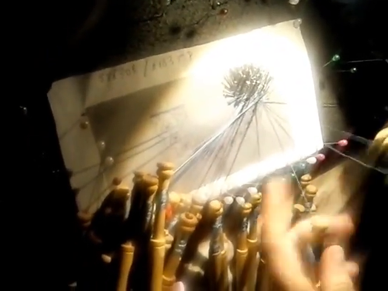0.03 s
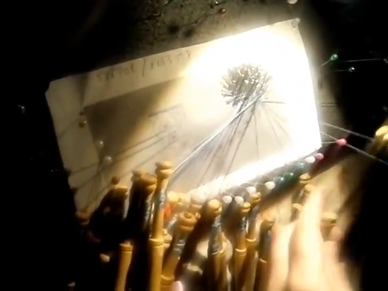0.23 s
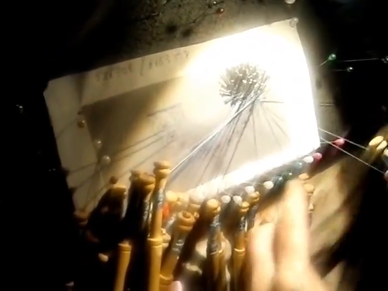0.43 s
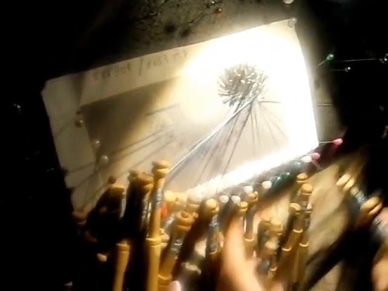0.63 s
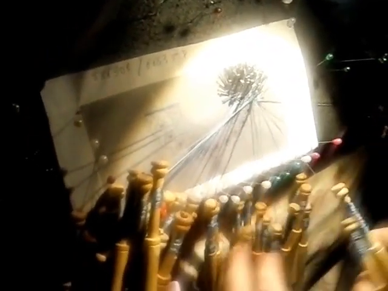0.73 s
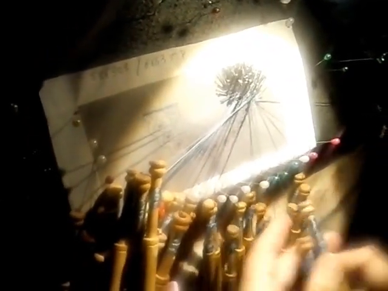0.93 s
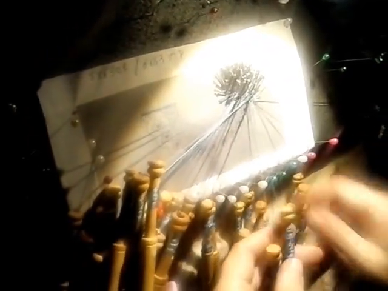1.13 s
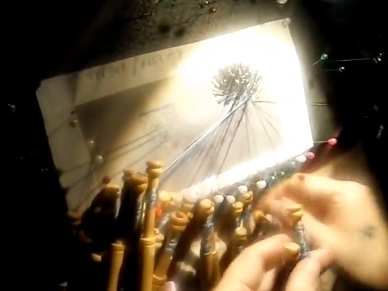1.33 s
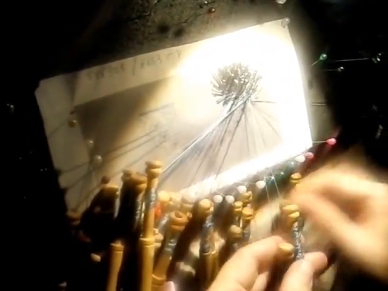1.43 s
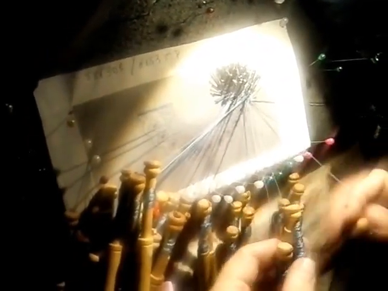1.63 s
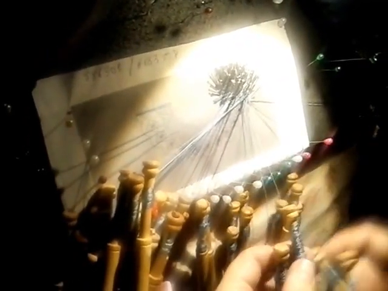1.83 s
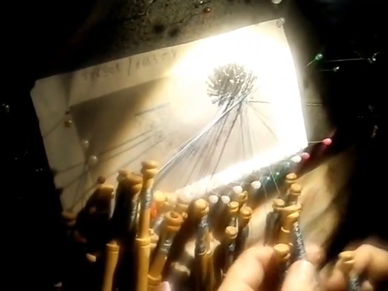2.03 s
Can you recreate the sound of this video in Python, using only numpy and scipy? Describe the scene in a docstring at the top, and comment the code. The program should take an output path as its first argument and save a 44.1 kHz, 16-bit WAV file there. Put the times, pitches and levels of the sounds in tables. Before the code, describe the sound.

Close up indoors, wooden bobbins tick sharply early on, pause with slight rubbing and sliding thread, then clatter most densely around one second, followed by lighter clicks, thuds and gentle hiss.

```python
"""Wooden lace bobbins knock together in clusters as hands cross them over a lace pillow in a small quiet room.
Each knock is a short broad tick plus three decaying bending modes of two slender sticks.
Some land on the pillow with a dull thud, a set of lower damped modes.
Fingers rustle on cloth and thread as shaped noise, over the steady noise of room and microphone."""
import sys
import numpy as np
from scipy import signal
from scipy.fft import rfft, irfft, next_fast_len
from scipy.io import wavfile
from scipy.ndimage import map_coordinates

SR = 44100
rng = np.random.default_rng(int(sys.argv[2]) if len(sys.argv) > 2 else 0)


def dump_mix(stems):
    """Bounce the given channels to the path in sys.argv[1] as a 16-bit WAV at rate SR."""
    frames = np.atleast_2d(stems).T  # one column per channel
    limited = np.clip(frames, -1, 1)  # hard clip at full scale
    pcm = np.round(limited * 32767).astype(np.int16)
    wavfile.write(sys.argv[1], SR, pcm)


N = 92610  # length in samples


def amp(db):
    """Decibels to amplitude: 20 dB is a factor of ten."""
    return 10 ** (np.asarray(db) / 20)


def unit(x):
    """Normalisation by signal power: the rms becomes 1."""
    return x / np.sqrt(np.mean(x ** 2) + 1e-20)


def along(points, hz):
    """Interpolation of (Hz, value) points on a logarithmic frequency axis."""
    f, v = np.transpose(points)
    return np.interp(np.log(hz + 1), np.log(f + 1), v)


def level(rows):
    """An envelope: gain per sample, linear in dB between (s, dB) points and at -120 dB outside them."""
    s, db = np.transpose(rows)
    return amp(np.interp(np.arange(N) / SR, s, db, left=-120, right=-120))


def wobble(rate):
    """Slow random modulation: a smooth curve through random knots, rate of them a second."""
    knots = rng.standard_normal(int(N * rate / SR) + 4)
    return map_coordinates(knots, [np.arange(N) * rate / SR])


def filtered(x, response):
    """Linear filtering: the spectrum of x is multiplied by a response given as a function of Hz."""
    m = next_fast_len(N + SR // 2)
    hz = np.fft.rfftfreq(m, 1 / SR)
    return irfft(rfft(x, m) * response(hz), m)[..., :N]


def noise(spectrum):
    """Coloured noise of rms 1: white noise filtered to a (Hz, dB) spectrum."""
    return unit(filtered(rng.standard_normal(N), lambda hz: amp(along(spectrum, hz))))


def bands(rows):
    """Narrow-band noise: white noise through Gaussian resonances (Hz, width Hz, dB), total rms 1."""
    def response(f):
        return sum(amp(db) * np.exp(-.5 * ((f - hz) / width) ** 2) for hz, width, db in rows)
    return unit(filtered(rng.standard_normal(N), response))


def add_modes(out, s, hz, db, t60, attack_s, shape=1):
    """Modal superposition: a struck body is a sum of sines from time s, each with its own decay."""
    t = np.arange(SR // 5) / SR
    hz, db, t60 = (np.asarray(v, float)[:, None] for v in (hz, db, t60))
    decay = amp(db - 60 * (t / t60) ** shape)  # 60 dB down at t60; above shape 1 it falls ever faster
    ring = decay * np.sin(2 * np.pi * hz * t)
    attack = (1 - np.exp(-t / attack_s)) ** 2
    out[round(s * SR):][:len(t)] += ring.sum(0) * attack


def add_tick(out, s, hz, half_s, db, phase):
    """Brief contact has a broad spectrum: a Gaussian pulse of a few cycles, peaking just after time s."""
    peak_s = .0007
    t = np.arange(200) / SR - peak_s
    tick = np.exp(-.5 * (t / half_s) ** 2) * np.cos(2 * np.pi * hz * t + phase)
    out[round(s * SR):][:len(t)] += amp(db) * tick


def bobbins():
    """Beating of nearly equal modes: both sticks ring at close pitches after each broad contact tick."""
    # Each row: start in seconds, levels in dB of the low tick, the high tick and the first mode,
    # then Hz, dB, Hz, dB for the second mode of each stick and the same four for the third mode,
    # and last the ring length as a multiple of the usual. Mode levels are before the attack.
    knocks = [(0.1701, -47, -53, -58, 4080, -50, 3840, -61, 6690, -61, 7530, -71, 1.01),
              (0.1962, -43, -43, -55, 3720, -55, 4450, -60.5, 6790, -61, 6500, -66, 1.01),
              (0.229, -25.5, -3.5, -41.5, 4144, -7, 4270, -32, 7380, -3.5, 7110, -14, 1.12),
              (0.2388, -54, -38, -43, 4280, -38, 4220, -47, 7490, -27, 7000, -37, 1.01),
              (0.262, -29, -16, -48, 4030, -22, 4480, -45, 7330, -13, 6970, -49, 0.87),
              (0.3032, -50, -48, -57.5, 4080, -41, 4280, -40.5, 7360, -53, 6640, -59, 1.01),
              (0.3055, -47, -44, -54, 4040, -34.5, 4360, -54.5, 7270, -50, 7500, -56.5, 1.6),
              (0.353, -44, -25, -49, 4020, -19.5, 4160, -37, 6870, -23, 7150, -21.5, 1.08),
              (0.3627, -34, -48, -41, 4230, -30, 4400, -44, 7150, -47, 7280, -56, 0.84),
              (0.4177, -48, -52, -50, 4220, -45, 4210, -46, 6970, -62, 7290, -64, 1.1),
              (0.4252, -55, -35, -53.5, 4130, -33.5, 4000, -39.5, 7120, -40.5, 7020, -43.5, 1.96),
              (0.4943, -48, -62, -51, 4050, -41, 3900, -50, 7150, -58, 7310, -57, 0.95),
              (0.524, -52, -54, -73, 3780, -52, 4000, -52, 7100, -56, 7160, -61, 1.2),
              (0.773, -45, -39.5, -62, 4650, -60, 3980, -66, 7000, -56, 6840, -49.5, 1.01),
              (0.9, -58, -45.5, -59.5, 4020, -55, 4160, -56, 6890, -56, 7170, -48, 1.7),
              (0.9196, -56, -35, -46.5, 4120, -37, 3810, -46, 7000, -39.5, 6900, -46, 1.8),
              (0.9272, -20, -7.5, -44, 4640, -22.5, 4080, -26, 6800, -14.5, 7420, -6.5, 0.77),
              (0.9293, -19, -9, -52, 4120, -16, 4510, -23, 6990, -15, 6810, -19, 0.52),
              (0.9303, -24.5, -28.5, -43.5, 4010, -19.5, 4670, -32.5, 7090, -17, 7650, -14, 0.89),
              (0.9333, -35, -28, -42.5, 4016, -23.5, 4300, -33, 6990, -20, 6730, -31, 1.8),
              (0.9744, -30, -18, -43, 4070, -25, 4240, -29, 7360, -25, 6780, -39.5, 1.4),
              (1.0078, -27.5, -13.5, -45.5, 3873, -24.5, 4320, -26, 7170, -10.5, 7056, -18.5, 1.52),
              (1.0222, -26.5, -45, -43, 4380, -30, 4140, -28.5, 7130, -24.5, 6630, -43, 2.34),
              (1.0483, -33, -50, -56, 4300, -38, 4010, -47.5, 7170, -44.5, 7000, -48, 0.86),
              (1.0592, -38, -53, -52, 4330, -45, 4030, -52.5, 7010, -52, 7360, -50, 1.01),
              (1.1349, -44.5, -54.5, -51.5, 4030, -51, 3890, -57, 7000, -64, 7040, -67, 1.2),
              (1.165, -44, -42.5, -56, 3840, -42, 4100, -46.5, 6980, -57, 7460, -63, 1.7),
              (1.1822, -54, -41, -59, 4004, -35.5, 3905, -38.5, 7220, -45, 6700, -68.5, 1.5),
              (1.1884, -40, -48.5, -60.5, 3870, -36.5, 3850, -45, 6920, -52, 7130, -59, 1.1),
              (1.21, -37, -50, -44.5, 4040, -40, 4140, -49.5, 6850, -58, 6940, -58, 1.3),
              (1.2408, -24.5, -29.5, -49.5, 4290, -23, 4670, -48, 7130, -23.5, 7010, -32, 1.2),
              (1.2505, -30.5, -41.5, -51.5, 4320, -27.5, 3880, -42.5, 7140, -39.5, 7400, -41.5, 1.35),
              (1.288, -45, -28.5, -47.5, 4000, -31, 3820, -32.5, 7150, -31, 7060, -26, 1.47),
              (1.3193, -33.5, -39, -48, 4220, -37.5, 3720, -52, 7130, -54, 6700, -62.5, 0.78),
              (1.5201, -50, -36, -56, 4100, -45, 4260, -52, 7290, -52, 6350, -56, 0.92),
              (1.5263, -45, -50, -60, 4545, -32, 4020, -44, 6930, -39, 7400, -59, 1.8),
              (1.5339, -52, -47, -54, 4510, -35, 4210, -36, 6820, -54, 7290, -56, 1.5),
              (1.5625, -38.5, -34, -57, 3830, -26.5, 4280, -40, 6920, -19, 6440, -22.5, 0.71),
              (1.5695, -45, -44.5, -67, 4100, -32, 4500, -59, 6870, -34, 6840, -47, 1.01),
              (1.5758, -57, -55, -63, 4220, -38, 3790, -44, 6720, -43, 6600, -43, 1.4),
              (1.592, -57, -50, -65, 4105, -35.5, 4200, -48.5, 6770, -43, 7000, -47, 1.7),
              (1.6561, -39.5, -27, -48, 3850, -29, 4100, -32.5, 7120, -22, 7240, -32, 0.92),
              (1.6628, -57, -49, -59, 4020, -38, 3940, -40, 7170, -34.5, 6750, -56, 1.01),
              (1.705, -50.5, -49, -69, 4390, -41, 3700, -49, 6770, -38, 6860, -38.5, 1.8),
              (1.7301, -45, -49, -59, 3630, -48, 4550, -51, 6980, -49.5, 7000, -54, 1.2),
              (2.0325, -35.5, -27, -44, 4280, -32, 4300, -59, 6840, -35.5, 7520, -63, 1.01),
              (2.0414, -48, -56, -48.5, 4540, -46, 3840, -38, 6770, -57, 7380, -71.5, 1.2),
              (2.0425, -47, -48, -50, 4350, -47, 4080, -47, 6600, -57, 6680, -62, 0.79),
              (2.0591, -38, -45, -61, 4430, -39, 3800, -51, 6740, -52, 7450, -63, 1.01),
              (2.0627, -40, -50, -61, 4370, -38, 3870, -43, 6580, -57, 6830, -59, 1.6),
              (2.0693, -43, -42, -54, 3830, -44, 4360, -46, 6570, -65, 6790, -78, 1.01)]
    # The low and the high contact tick. Each row: centre in Hz, half length in seconds.
    ticks = [(2450, 0.00029), (5400, 0.00014)]
    # Usual decay of the bending modes by 60 dB, in seconds: first, second, third mode.
    ring_t60 = [0.052, 0.017, 0.015]
    first_hz, first_scatter, tick_scatter = 1452, .033, .035  # scatters are fractions of the pitch
    first_attack_s, attack_s = .00097, .00025  # the lowest mode builds slowly
    grip_shape = 1.06  # held sticks die faster and faster
    out = np.zeros(N + SR)
    first, second, third = ring_t60
    draws = rng.standard_normal((len(knocks), 5))
    for (s, low, high, first_db, *modes, length), r in zip(knocks, draws):
        for (hz, half_s), db, shift, phase in zip(ticks, (low, high), r[1:3], r[3:]):
            add_tick(out, s, hz * (1 + tick_scatter * shift), half_s, db, 2 * phase)
        hz = first_hz * (1 + first_scatter * r[0])
        add_modes(out, s, [hz], [first_db], [length * first], first_attack_s)
        t60 = length * np.array([second, second, third, third])
        add_modes(out, s, modes[::2], modes[1::2], t60, attack_s, grip_shape)
    return out[:N]


def pillow():
    """Damped resonance: soft landings ring the low modes of the padded board, which soon die."""
    # Each row: start in seconds, level in dB of each pillow mode before the attack,
    # ring length as a multiple of the usual.
    thuds = [(0.0425, -58.5, -55, -46.5, -50.5, -58, -68, -51, 1.2),
             (0.1012, -61, -60.5, -63.5, -64, -47, -65, -65.5, 0.9),
             (0.1235, -60, -55, -51, -53.5, -45.5, -65, -61.5, 0.9),
             (0.1582, -56, -51.5, -43.5, -59, -41.5, -59, -63, 1.55),
             (0.1622, -52, -48, -40, -61, -40, -61, -61, 0.65),
             (0.1965, -61, -61, -47, -37, -50, -60, -38, 1.5),
             (0.2285, -59.5, -57, -36, -43, -47, -44.5, -43, 0.82),
             (0.2355, -48.5, -57, -58, -37, -53, -58.5, -59, 0.9),
             (0.3027, -45, -56, -48, -51, -34.5, -63, -59, 1.07),
             (0.4316, -58, -58, -56, -51, -45.5, -62, -64, 1.9),
             (0.7385, -68, -47, -59.5, -57, -44, -50, -57.5, 2.05),
             (0.7599, -63, -60.5, -55.5, -58, -46, -46.5, -43.5, 1.86),
             (0.8985, -55, -55.5, -52.5, -62.5, -48.5, -67.5, -67, 1),
             (0.9279, -50.5, -37, -21, -38.5, -25, -46.5, -36.5, 0.63),
             (0.9308, -37, -25, -35.5, -34.5, -40, -31.5, -51, 1.06),
             (1.0485, -60.5, -62, -45, -50, -39.5, -63.5, -49, 0.54),
             (1.1436, -41, -42, -34.5, -56.5, -39.5, -58, -36, 0.95),
             (1.407, -56, -57, -51, -58.5, -51.5, -61, -55, 1.4),
             (1.6312, -64, -37.5, -40, -43.5, -52.5, -63, -50, 0.47),
             (1.7175, -61, -40, -34.5, -36.5, -30.5, -62, -37, 1.2),
             (1.7265, -61, -47, -41.5, -55, -34.5, -45, -38.5, 2.1)]
    # Modes of the pillow. Each row: frequency in Hz, usual decay by 60 dB in seconds.
    pillow_modes = [(140, 0.071), (285, 0.041), (490, .03), (690, 0.046), (815, 0.038), (1020, 0.027),
                    (1850, 0.0072)]
    detune, attack_s = .012, .0004  # random pitch spread as a fraction, seconds
    out = np.zeros(N + SR)
    hz, t60 = np.transpose(pillow_modes)
    draws = rng.standard_normal((len(thuds), len(hz)))
    for (s, *db, length), r in zip(thuds, draws):
        add_modes(out, s, hz * (1 + detune * r), db, length * t60, attack_s)
    return out[:N]


def fingers():
    """Friction noise: grainy rubbing on cloth, a dragged bobbin, and thread sliding under tension."""
    # Rustle on cloth. Each row: time in seconds, level in dB.
    rustle = [(0, -64.5), (0.047, -57), (.09, -66), (.17, -64.5), (.2, -54.5), (.24, -60), (.7, -66.5),
              (.73, -57.5), (.765, -61.5), (.8, -65.5), (.9, -58), (1.381, -61.5), (1.41, -58),
              (1.45, -55.5), (1.49, -60), (1.6, -56.5), (1.63, -55.5), (1.72, -59.5), (1.77, -63.5),
              (2.1, -68.5)]
    # Spectrum of the cloth rustle. Each row: frequency in Hz, relative density in dB per Hz.
    cloth_spectrum = [(300, -7), (900, -5), (1400, -3), (2200, -4), (3300, -7), (5000, -11), (8000, -17.5)]
    # A bobbin dragged over the pillow. Each row: time in seconds, level in dB.
    rub = [(.715, -77), (.74, -55.5), (.752, -63), (.765, -59.5), (.79, -80)]
    # Resonances of the dragged bobbin. Each row: centre in Hz, width in Hz, relative level in dB.
    rub_bands = [(930, 59, -1), (2030, 150, -3), (2950, 220, -7.5)]
    # Thin whistle of sliding thread. Each row: time in seconds, level in dB.
    thread = [(.72, -85), (.74, -66), (.765, -65), (.79, -85), (.815, -54.5), (.835, -77), (.857, -59.5),
              (.885, -84)]
    # Band of the thread whistle. Each row: centre in Hz, width in Hz, relative level in dB.
    thread_bands = [(5450, 380, 0)]
    grains = amp(2.5 * wobble(140))  # dB per unit of wobble, knots a second
    cloth = unit(grains * noise(cloth_spectrum))
    return level(rustle) * cloth + level(rub) * bands(rub_bands) + level(thread) * bands(thread_bands)


def scattered(x):
    """Scattering: hands, pins and neighbouring bobbins add a dense short smear, new every tenth of a second."""
    scatter_db, scatter_t60_s = -8, .0086
    out, step = np.pad(x, (0, SR)), SR // 10
    t = np.arange(1, SR // 40) / SR
    for a in range(0, N, step):
        smear = rng.standard_normal(len(t)) * amp(-60 * t / scatter_t60_s)
        wet = signal.fftconvolve(x[a:a + step], smear / np.linalg.norm(smear))
        out[a + 20:][:len(wet)] += amp(scatter_db) * wet  # 20 samples late
    return out[:N]


def room(x):
    """Reverberation: walls answer after a short gap; each tenth of a second gets its own decaying tail."""
    # Decay of the room. Each row: frequency in Hz, time to fall by 60 dB in seconds.
    room_t60 = [(300, 0.38), (2000, .25), (5000, 0.16), (8000, 0.31)]
    wall_s = .0079  # gap before the walls answer
    out, step = np.zeros(N + 2 * SR), SR // 10
    for a in range(0, N, step):
        hz, t, z = signal.stft(rng.standard_normal(SR // 2), SR, nperseg=256)
        decay = amp(-60 * t / along(room_t60, hz)[:, None])
        tail = signal.istft(z * decay, SR, nperseg=256)[1]
        wet = signal.fftconvolve(x[a:a + step], tail / np.linalg.norm(tail))
        out[a + round(wall_s * SR):][:len(wet)] += wet
    return out[:N]


def scene():
    """Superposition: scattered knocks and thuds, their reverberation, and the fingers' dry friction."""
    room_db = -14
    near = scattered(bobbins() + pillow())
    return (near + amp(room_db) * room(near) + fingers())[None]


def background():
    """Stationary noise: steady circuit hiss and low room noise share one coloured spectrum."""
    # Each row: frequency in Hz, relative density in dB per Hz.
    hiss = [(12, -55.5), (20, -38), (50, -10), (85, -4), (150, -3), (350, -7), (700, -9.5), (2000, -21),
            (4400, -21), (7000, -21), (7700, -25), (8070, -35.5), (8440, -45), (8690, -57), (9500, -81.5)]
    hiss_db = -57
    return amp(hiss_db) * noise(hiss)


def record(dry):
    """Band limiting: the microphone rolls off bass and, steeply, treble; noise joins before a sharp top cut."""
    bass_cut_hz, mic_hz, mic_order, top_hz = 80, 7126, 19.8, 8845

    def microphone(hz):
        bass = hz ** 2 / np.sqrt(hz ** 4 + bass_cut_hz ** 4)
        return bass / np.sqrt(1 + (hz / mic_hz) ** (2 * mic_order))

    mic = filtered(dry, microphone)
    return filtered(mic + background(), lambda hz: hz < top_hz)


dry = scene()
out = record(dry)
dump_mix(out)
```